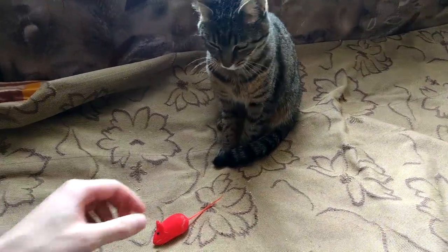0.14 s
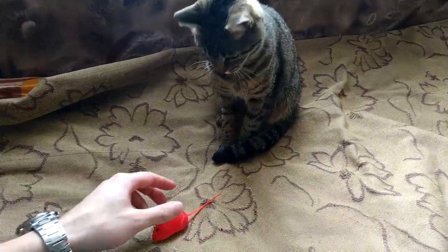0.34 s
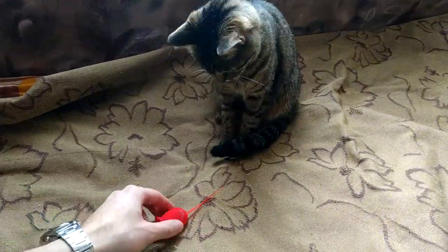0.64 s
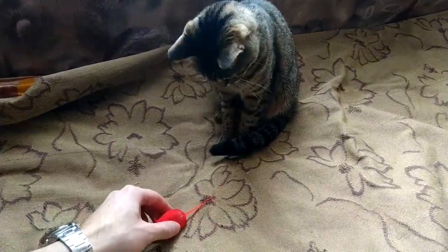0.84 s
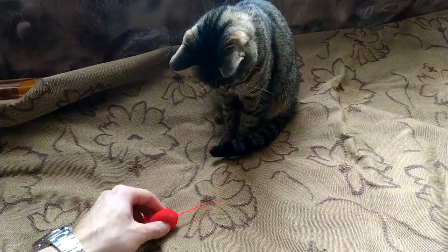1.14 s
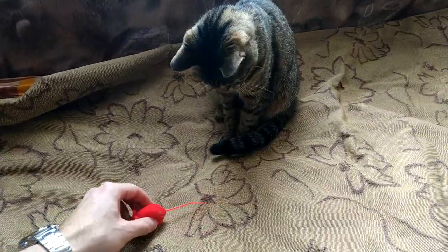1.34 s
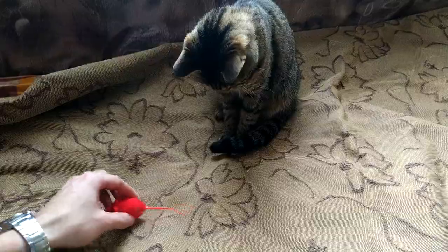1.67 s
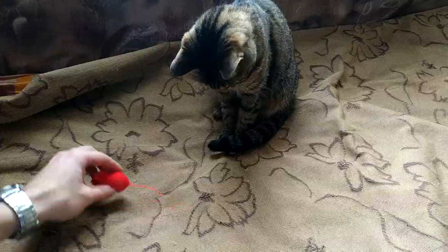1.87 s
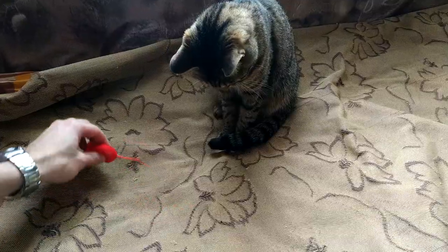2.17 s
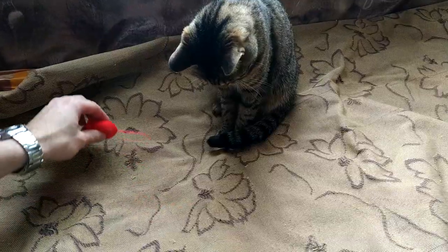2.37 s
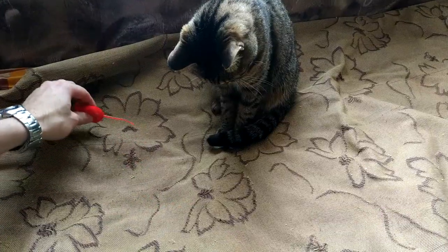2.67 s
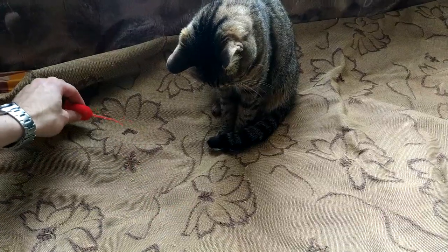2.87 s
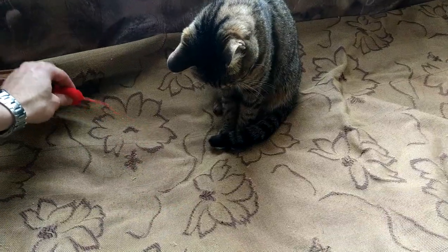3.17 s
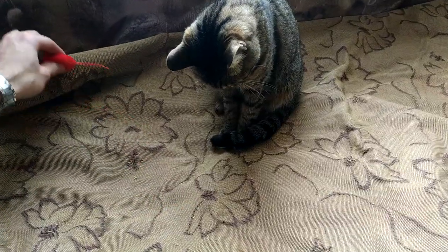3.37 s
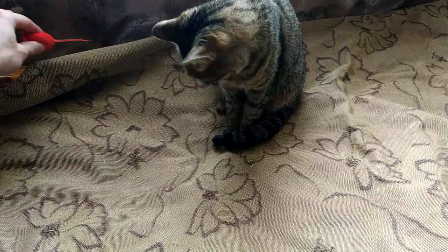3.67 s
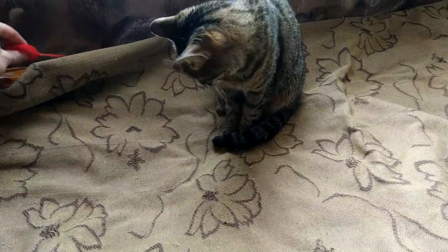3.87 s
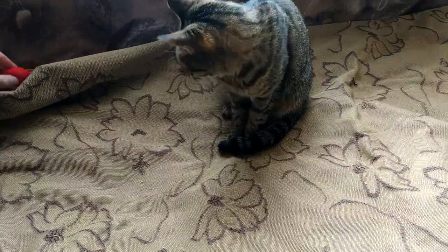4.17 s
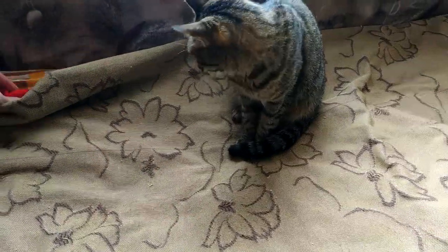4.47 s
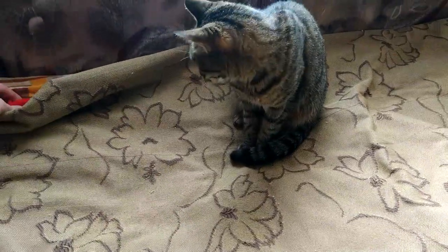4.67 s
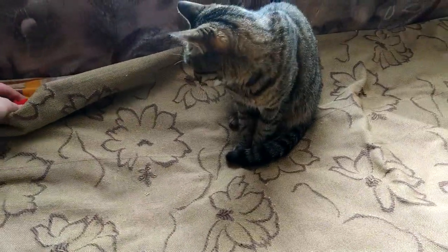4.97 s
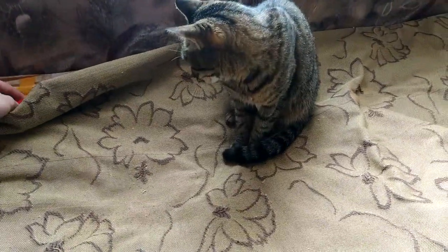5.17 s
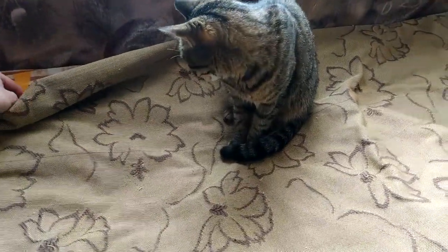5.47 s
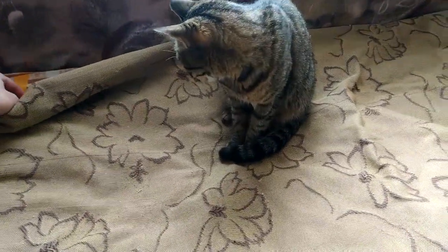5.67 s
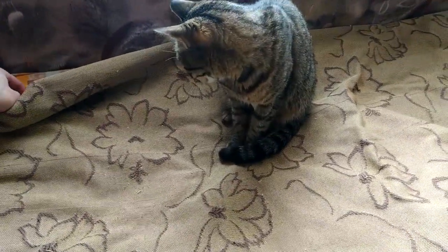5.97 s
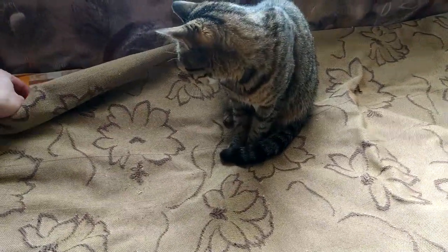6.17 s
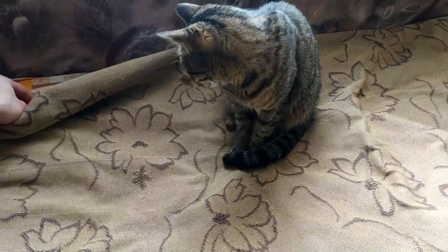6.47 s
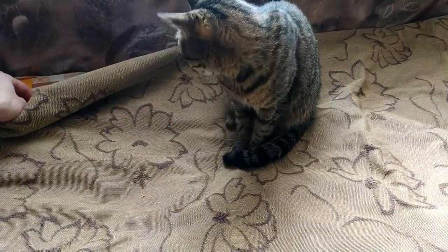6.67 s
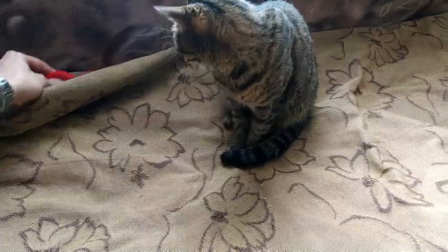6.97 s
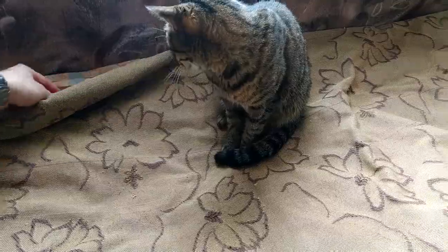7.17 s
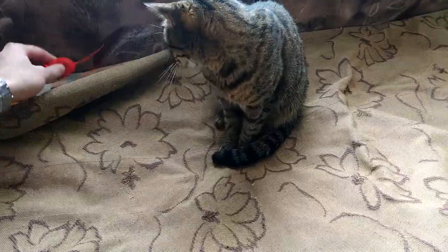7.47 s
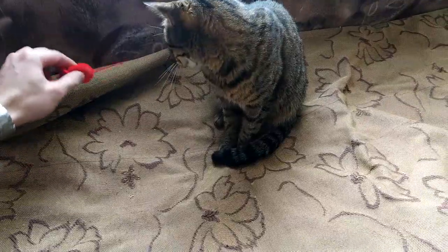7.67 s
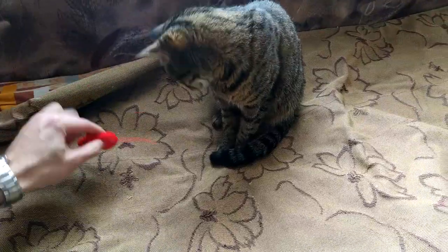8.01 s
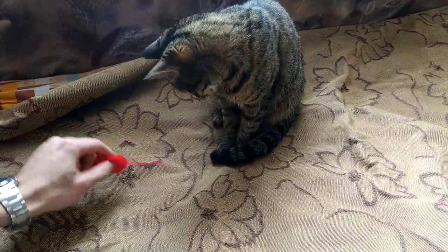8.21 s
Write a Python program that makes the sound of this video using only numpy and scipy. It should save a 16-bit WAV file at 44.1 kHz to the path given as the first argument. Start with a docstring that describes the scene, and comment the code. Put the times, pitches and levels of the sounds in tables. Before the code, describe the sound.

Quiet room noise and a very faint appliance hum run throughout. At 0.5 seconds a hand softly brushes sofa cloth, and a few more faint brushes and dull bumps follow later. At 1 second a small rubber toy mouse gives one short, high, close squeak. From 2.1 seconds it squeaks again and again, unevenly, two or three times a second. Each squeak lasts a tenth of a second or less, rising and falling slightly in pitch and ringing very briefly in the small, soft room. The squeaks are mostly shrill until about 4.3 seconds, duller and gentler from about 5 to 6.6, then shrill again from 6.8. From 2.3 seconds the toy occasionally sucks air back with a faint hiss, with a tiny peep at 3.3. The hum swells slightly around 5.6 seconds. The last squeak comes at 8.1 seconds, followed by a final faint hiss.

```python
"""Quiet room noise and a faint appliance hum run throughout. At 0.5 s a hand first brushes a sofa's cloth.
From 1 s it squeezes a small rubber mouse again and again. Each squeeze blows a tiny reed: pitch arches
with the air pressure, shrill when pressed hard, duller when gentle; the small soft room rings briefly.
From 2.3 s the toy now and then sucks air back with a faint hiss, at 3.3 s with a faint peep too.
At 5.6 s the lowest hum swells briefly. The last squeak comes at 8.1 s, then a last hiss."""
import sys
import numpy as np
from scipy import signal
from scipy.fft import rfft, irfft
from scipy.io import wavfile
from scipy.ndimage import uniform_filter1d, minimum_filter1d

SR = 44100
rng = np.random.default_rng(int(sys.argv[2]) if len(sys.argv) > 2 else 0)


def bounce(signal):
    """Save signal as a 16-bit WAV file at the path given by the first command-line argument."""
    frames = np.transpose(np.atleast_2d(signal))
    limited = np.clip(frames, -1, 1)
    pcm = np.round(limited * 32767).astype(np.int16)
    wavfile.write(sys.argv[1], SR, pcm)


N = 367970

# noise spectra: f/Hz, relative density/dB
AIR_SPECTRUM = [(24, -82.5), (40, -32.5), (147, -20.5), (178, -7), (271, -5.5), (431, -11.5), (525, -8.5),
                (565, -10.5), (758, -11), (1180, -16), (1970, -19), (2850, -19), (3460, -19), (4320, -20.5),
                (14000, -20)]  # room noise
SWISH_SPECTRUM = [(200, -5), (700, -5.5), (2000, 0), (6000, 0), (9000, -2.5), (14000, -26)]  # hand on the weave
BUMP_SPECTRUM = [(40, -22), (120, -15), (200, 4.5), (330, -2), (700, -4), (2000, -20.5), (6000, -45)]  # hand on the cushion
PUFF_SPECTRUM = [(15, -6.5), (35, -2), (80, -3), (150, 1), (400, -31.5)]  # air pushed out
REFILL_SPECTRUM = [(1500, -26), (5000, -24.5), (8000, 0), (10000, 12), (12000, 0.5), (14500, -25)]  # air drawn in
CHIFF_SPECTRUM = [(150, -15), (600, -9), (1200, 3), (3000, 0), (9000, 0.5), (14000, -5.5)]  # first rush through the reed
# left-right likeness of noise: f/Hz, correlation/0-1
STEREO_CORRELATION = [(50, 0), (250, 0.7), (600, .45), (1500, 0), (14000, .05)]
# room noise envelope: t/s, level/dB
AIR_ENVELOPE = [(0, -56.5), (2, -56), (3.2, -55), (5.6, -55), (6.2, -58.5), (7.1, -58), (8.34, -60.5)]
# appliance tones: f/Hz, level/dB
HUM_TONES = [(182, -79.5), (272, -79), (333, -79.5), (540, -84.5), (1249, -83.5)]
# room tail decay: f/Hz, T60/s
TAIL_T60 = [(1000, 0.2), (3000, 0.17), (7000, 0.18), (10000, 0.17), (14000, 0.16)]
# room tail against direct sound: f/Hz, level/dB
TAIL_SPECTRUM = [(1400, -9), (3000, -5), (6000, -7.5), (10000, -4), (14000, -9.5)]
# hand strokes on cloth: t/s, length/s, swish/dB, bump/dB
CLOTH_STROKES = [(0.494, 0.17, -60, -61.5), (1.58, 0.081, -57, -75), (2.424, 0.089, -53.5, -52.5),
                 (2.468, 0.14, -70, -54.5), (5.691, 0.1, -54, -55), (7.115, 0.089, -63, -62.5)]
# air intakes at the nozzle: t/s, length/s, level/dB
REFILL_HISSES = [(2.263, .13, -54), (3.264, 0.11, -55), (3.546, .13, -57), (3.918, 0.12, -54),
                 (6.98, 0.14, -57), (7.83, 0.11, -55), (8.291, 0.13, -52)]
# where the toy is held: t/s, right lag/ms, overtone left-right/dB, puff against fundamental/dB
TOY_PATH = [(1.0, 0.012, -1.5, -60.5), (2.15, 0.13, -2, -42), (2.9, .19, 6.5, -33), (3.5, .19, -1, -38.5),
            (4.3, 0.25, 4, -48), (6.5, .23, 3, -41.5), (7.399, .2, 0, -35), (8.1, .14, 2, -47.5)]
# one row a reed sound: the squeaks, plus a faint peep at 3.3 s as air is drawn back in
# t/s, length/s, top pitch/Hz, crest position/0-1, pitch rise/ms, fundamental/dB,
# overtones/dB, shrill band lift/dB, its centre/Hz, its width/Hz, fundamental left-right/dB
REED_SOUNDS = [(0.96, 0.068, 1550, 0.45, 6.3, -28, -28, 13, 9900, 3100, -4.5),
               (2.115, 0.084, 1564, 0.32, 6, -28.5, -35.5, 27, 10110, 2800, -2.5),
               (2.592, 0.05, 1450, 0.22, 4.5, -30, -34.5, 22, 10100, 2020, -7.5),
               (2.847, 0.06, 1447, .72, 3.16, -33, -32.5, 18, 10150, 2030, -8),
               (3.149, 0.02, 1365, 0.36, 1.94, -33, -38, 15, 9800, 1890, -5),
               (3.315, 0.024, 900, .5, 3.8, -63, -80, 0, 10000, 2400, -4),
               (3.409, 0.058, 1511, 0, 4.5, -35.5, -28.5, 15.5, 10140, 2200, -2),
               (3.781, 0.076, 1552, .46, 5.1, -35, -33, 19, 10060, 2400, -5),
               (4.214, 0.094, 1522, 0.4, 3.7, -32.5, -37, 23.5, 10250, 2000, -7.5),
               (4.432, 0.032, 1335, 0.21, 3.2, -36, -40, 11, 11800, 1900, 4),
               (4.691, 0.071, 1490, 0.3, 3.4, -29.5, -36, 6.5, 9000, 2390, -1.5),
               (5.054, 0.036, 1314, 0.35, 2.1, -35, -43, -11.5, 8600, 2420, -2.5),
               (5.605, 0.016, 932, .7, 4.3, -52.5, -80, 0, 10100, 2400, -13),
               (5.721, 0.064, 1526, 0.36, 8.5, -30, -29.5, -1, 10000, 2390, -0.5),
               (6.018, .035, 1447, 0.24, 2.15, -29.5, -30, -2, 11100, 2400, -7),
               (6.298, 0.029, 1372, 0.2, 1.9, -39.5, -43.5, -13, 9500, 2400, -1),
               (6.565, .034, 1441, 0.49, 1.6, -37, -39.5, -4, 9400, 2400, -3.5),
               (6.842, 0.068, 1606, 0.05, 4.18, -30, -33, 20.5, 9370, 1900, 0),
               (7.312, 0.1, 1544, 0.64, 4.8, -31, -37, 24, 10400, 2170, -0.5),
               (7.526, 0.049, 1329, 0.23, 3.1, -39.5, -36, 16.5, 11250, 1720, 1),
               (7.702, 0.055, 1539, 0.52, 5.1, -37, -32.5, 20.5, 9580, 2650, -5.5),
               (8.096, .04, 1464, .66, 3.3, -29, -34, 20.5, 10300, 2400, -7)]


def gain_of(db):
    """Decibels to amplitude."""
    return 10 ** (np.asarray(db) / 20)


def unit_rms(x):
    """Scales to rms 1."""
    return x / np.sqrt(np.mean(x ** 2) + 1e-20)


def lookup(table, hz):
    """Interpolates a table over log frequency."""
    table_hz, values = np.transpose(table)
    return np.interp(np.log(hz + 1), np.log(table_hz + 1), values)


def shaped(x, spectrum):
    """Filters x by a spectrum table."""
    size = x.shape[-1]
    return irfft(rfft(x) * gain_of(lookup(spectrum, np.fft.rfftfreq(size, 1 / SR))), size)


def wander(size, rate_hz):
    """Smooth random curve, rms about 1, moving up to rate_hz."""
    hz = np.fft.rfftfreq(size + 8192, 1 / SR)
    white = rfft(rng.standard_normal(size + 8192))
    return unit_rms(irfft(white / (1 + (hz / rate_hz) ** 4)))[:size]


def noise(spectrum):
    """Shaped stereo noise, rms 1, sides more alike in the bass."""
    hz = np.fft.rfftfreq(N, 1 / SR)
    left, other = rfft(rng.standard_normal((2, N)))
    correlation = np.clip(lookup(STEREO_CORRELATION, hz), 0, 1)
    right = correlation * left + np.sqrt(1 - correlation ** 2) * other
    return unit_rms(irfft(np.array([left, right]) * gain_of(lookup(spectrum, hz)), N))


def swells(starts_s, lengths_s, levels_db):
    """Envelope with one half-sine hump per event."""
    t = np.arange(N) / SR
    return sum(gain_of(db) * np.sin(np.pi * np.clip((t - start_s) / length_s, 0, 1))
               for start_s, length_s, db in zip(starts_s, lengths_s, levels_db))


def background(drift_hz=3, swell_start_s=5.6, swell_length_s=.45, swell_db=16):
    """Room noise and a distant appliance's wavering hum; the lowest tone swells once."""
    air = noise(AIR_SPECTRUM) * gain_of(np.interp(np.arange(N) / SR, *np.transpose(AIR_ENVELOPE)))
    hums = []
    for hz, db in HUM_TONES:
        cycles = np.cumsum(hz + drift_hz * wander(N, 11.7)) / SR
        hums.append(gain_of(db) * np.sqrt(2) * np.sin(2 * np.pi * cycles))
    return air + sum(hums) + hums[0] * swells([swell_start_s], [swell_length_s], [swell_db])


def room(x, first_echo_s=.0062, near_db=-21, near_t60_s=.06):
    """Direct sound, quick echoes off sofa and near walls, and a short tail dying band by band."""
    size, step = 12288, 12
    delay_s = np.arange(size) / SR
    taps = np.zeros((2, size))
    slots = np.arange(0, size - step, step)
    positions = slots + rng.integers(0, step, (2, len(slots)))
    np.put_along_axis(taps, positions, rng.choice([-1., 1.], positions.shape), 1)
    taps *= delay_s > first_echo_s
    hz, t, bands = signal.stft(taps, SR, nperseg=256)
    decay = gain_of(-60 * t / lookup(TAIL_T60, hz)[:, None])
    tail = signal.istft(bands * decay, SR, nperseg=256)[1][:, :size]
    tail = shaped(tail / np.linalg.norm(tail[0]), TAIL_SPECTRUM)
    near = taps * rng.standard_normal(taps.shape) * gain_of(-60 * delay_s / near_t60_s)
    near *= gain_of(near_db) / np.linalg.norm(near[0])
    direct = delay_s == 0
    return signal.fftconvolve(x, direct + near + tail, axes=1)


def cloth(grain_db=3):
    """The hand slides over the weave (grainy swish) and presses the cushion (dull bump)."""
    starts_s, lengths_s, swish_db, bump_db = np.transpose(CLOTH_STROKES)
    grain = unit_rms(gain_of(grain_db * wander(N, 200)))
    swish = swells(starts_s, lengths_s, swish_db) * grain * noise(SWISH_SPECTRUM)
    bump = swells(starts_s, lengths_s, bump_db) * noise(BUMP_SPECTRUM)
    return swish + bump


def refills():
    """Air hisses back in through the nozzle."""
    return swells(*np.transpose(REFILL_HISSES)) * noise(REFILL_SPECTRUM)


def puffs(lead_s=.012, length_s=.04):
    """A soft, low puff of air starts each reed sound."""
    starts_s, fundamental_db = np.array(REED_SOUNDS)[:, [0, 5]].T
    path_s, _, _, puff_db = np.transpose(TOY_PATH)
    levels_db = fundamental_db + np.interp(starts_s, path_s, puff_db)
    return swells(starts_s - lead_s, np.full(len(starts_s), length_s), levels_db) * noise(PUFF_SPECTRUM)


def chiff(t, peak_s=.0056):
    """Breathy burst as the reed catches."""
    rush = shaped(rng.standard_normal((2, len(t))), CHIFF_SPECTRUM)
    age = np.maximum(t, 0) / peak_s
    return unit_rms(rush) * age ** 2 * np.exp(1 - age ** 2)


def pitch_arch(t, length_s, crest, rise_ms, drop_s=.0029):
    """Pitch as a share of its top while the pressure builds, crests and gives out."""
    t = np.clip(t, 0, length_s)
    progress = t / length_s
    crest = np.clip(crest, .02, .9)
    snap = .2 * np.exp(-1000 * t / max(rise_ms, 1))
    creep = .02 * np.clip(1 - progress / crest, 0, 1) ** 2
    sag = .12 * np.clip((progress - crest) / (1 - crest), 0, 1) ** 2.2
    drop = .079 * np.exp((t - length_s) / drop_s)
    return 1 - snap - creep - sag - drop


def pitch_jitter(t, length_s, top_hz, snap_s=.0035, steady_hz=1440, weak_range_hz=120):
    """Relative pitch noise: the reed rasps as it starts, as pressure runs out, and if blown weakly."""
    snap = .035 * np.exp(-abs(t) / snap_s)
    slack = .009 * np.clip(2 * t / length_s - 1, 0, 1) ** 3
    weak = .004 * np.clip((steady_hz - top_hz) / weak_range_hz, 0, 1)
    return (.0005 + snap + slack + weak) * wander(len(t), 900)


def harmonic_envelope(t, length_s, height, low_attack_s=.0031, high_attack_s=.0043):
    """Overtones need the reed to slap shut: with height (0-1) they start later and fade sooner."""
    attack_s = low_attack_s + height * (high_attack_s - low_attack_s)
    release_share = np.interp(height, [0, 1], [.066, .2])
    rise = 1 - np.exp(-(np.maximum(t, 0) / attack_s) ** 2)
    fall = np.clip((1 - t / length_s) / release_share, 0, 1)
    return rise * fall


def reed(row, rest_hz=850, lead_s=.004, run_out_s=.016, kick_db=3, kick_peak_s=.0028,
         tilt_db_per_khz=-.5377, dim_db_per_percent=.2057, octave_db=-2,
         whistle_db=-9, hiss_db=-56, chiff_db=-3, flicker_db=1.6, flutter_db=.3):
    """One reed sound as (start/s, stereo wave): pitch and brightness follow the air pressure."""
    (start_s, length_s, top_hz, crest, rise_ms, fundamental_db, overtones_db,
     shrill_db, shrill_hz, shrill_width_hz, low_pan_db) = row
    path_s, lags_ms, pans_db, _ = np.transpose(TOY_PATH)
    lag_s = np.interp(start_s, path_s, lags_ms) / 1000
    high_pan_db = np.interp(start_s, path_s, pans_db)
    t = np.arange(-lead_s, length_s + run_out_s, 1 / SR)
    size = len(t)
    arch = pitch_arch(t, length_s, crest, rise_ms)
    blown = np.interp(t, [-lead_s, 0, length_s, length_s + run_out_s], [0, 1, 1, 0])
    hz = rest_hz + blown * np.maximum(top_hz * arch - rest_hz, 0)
    hz *= 1 + pitch_jitter(t, length_s, top_hz)
    cycles = np.cumsum(hz) / SR - hz * np.array([[0], [lag_s]])
    dim_db = dim_db_per_percent * 100 * (1 - arch)
    wave = np.zeros((2, size))
    for k in range(1, 12):
        height = min((k - 1) / 6, 1)
        envelope = harmonic_envelope(t, length_s, height)
        if k == 1:  # overdriven by the first push; whistles softly before and after the reed beats
            level_db = fundamental_db + kick_db * np.exp(-(t / kick_peak_s - 1) ** 2)
            envelope = np.maximum(envelope, gain_of(whistle_db) * blown ** 2)
            pan_db = low_pan_db
        else:
            lift_db = shrill_db * np.exp(-.5 * ((k * hz - shrill_hz) / shrill_width_hz) ** 2)
            tilt_db = tilt_db_per_khz * (k * hz - 3000) / 1000
            level_db = overtones_db + tilt_db + lift_db - dim_db + (k == 2) * octave_db
            pan_db = high_pan_db
        flicker = np.sqrt(height) * np.array([wander(size, 20), wander(size, 60)])
        sides = unit_rms(gain_of([[pan_db / 2], [-pan_db / 2]]))
        phase = 2 * np.pi * (k * cycles + .15 * rng.standard_normal())
        wave += np.sqrt(2) * gain_of(level_db + flicker_db * flicker) * sides * envelope * np.cos(phase)
    wave += gain_of(hiss_db) * abs(wave) * rng.standard_normal(wave.shape)
    wave += gain_of(overtones_db + chiff_db) * chiff(t)
    return start_s - lead_s, wave * gain_of(flutter_db * wander(size, 170))


def reed_sounds(trim_db=.17):
    """The squeaks and the refill peep, each with its own room echoes."""
    mix = np.zeros((2, N))
    for row in REED_SOUNDS:
        start_s, wave = reed(row)
        start = round(start_s * SR)
        echoed = room(wave)[:, :N - start]
        mix[:, start:start + echoed.shape[1]] += echoed
    return gain_of(trim_db) * mix


def scene():
    """Toy and hand over the room noise."""
    toy = reed_sounds() + puffs() + refills()
    return toy + room(cloth())[:, :N] + background()


def record(dry, ceiling=.82, cutoff_hz=14250):
    """Smooth peak limiter, then low-pass."""
    allowed = np.minimum(1, ceiling / (abs(dry).max(0) + 1e-9))
    gain = uniform_filter1d(minimum_filter1d(allowed, size=700), size=600)
    lowpass = signal.firwin(201, cutoff_hz, window=("kaiser", 8), fs=SR)
    return signal.oaconvolve(dry * gain, lowpass[None], "same")


dry = scene()
out = record(dry)
bounce(out)
```